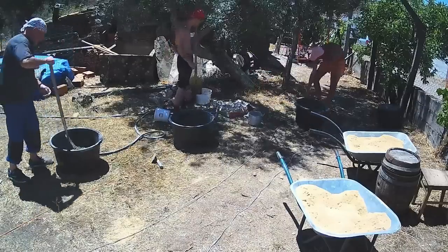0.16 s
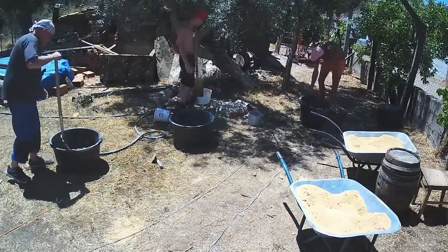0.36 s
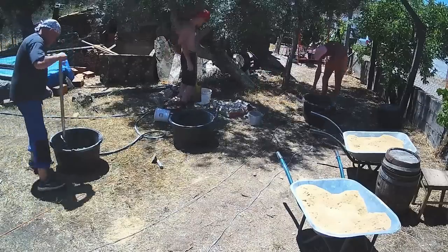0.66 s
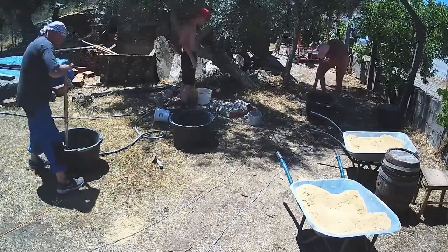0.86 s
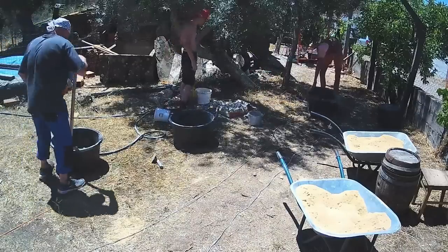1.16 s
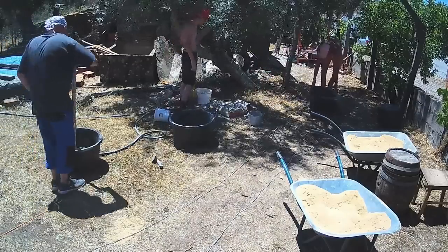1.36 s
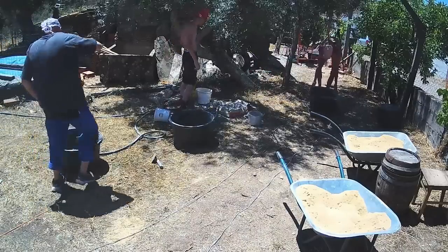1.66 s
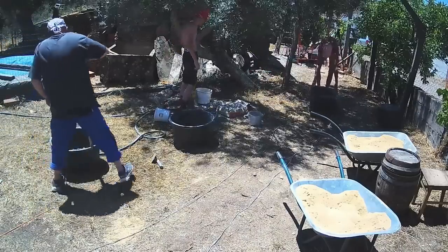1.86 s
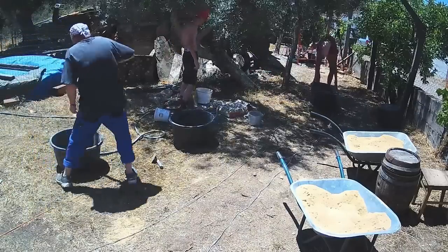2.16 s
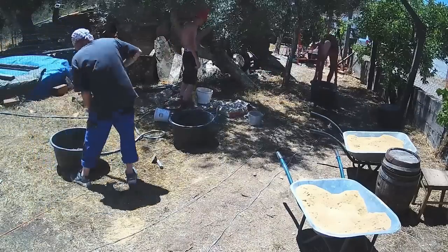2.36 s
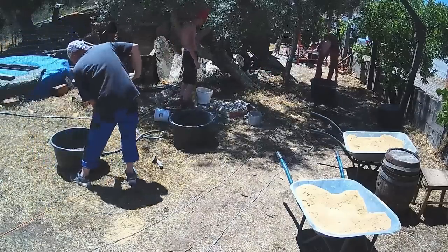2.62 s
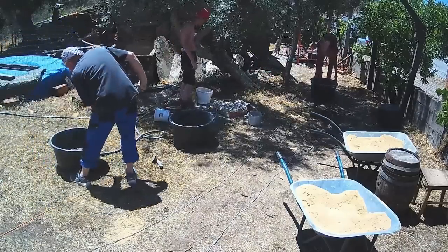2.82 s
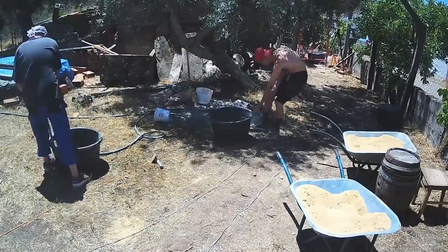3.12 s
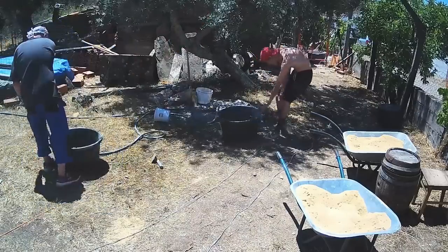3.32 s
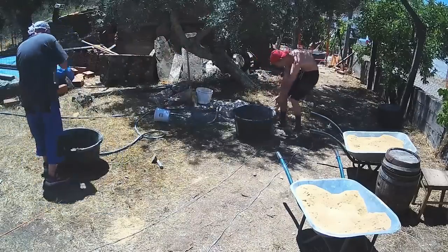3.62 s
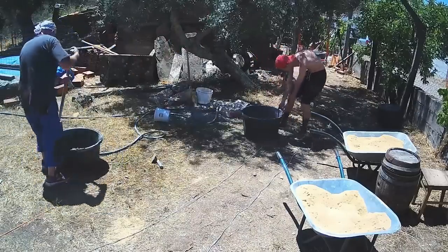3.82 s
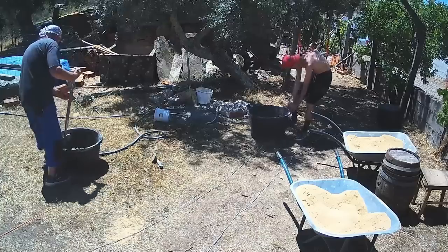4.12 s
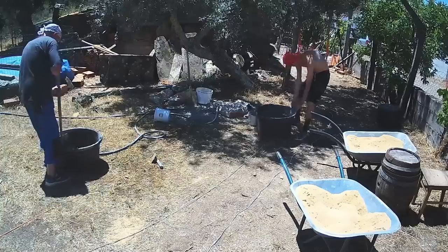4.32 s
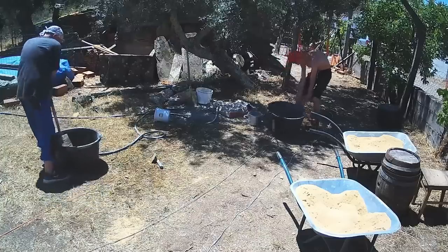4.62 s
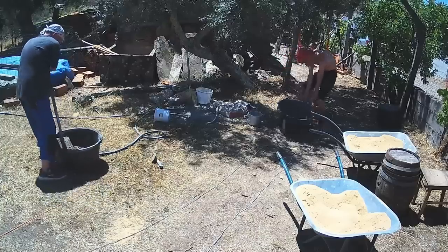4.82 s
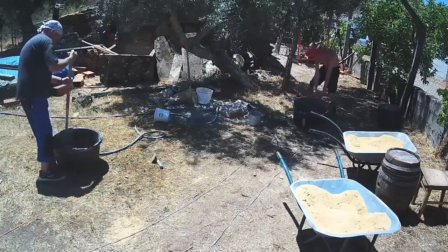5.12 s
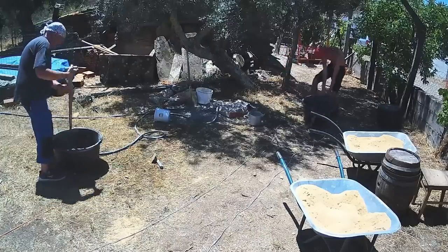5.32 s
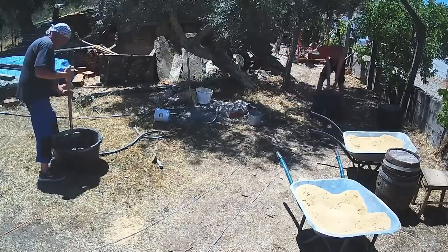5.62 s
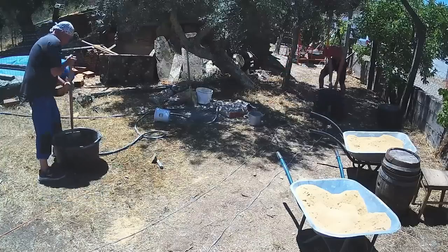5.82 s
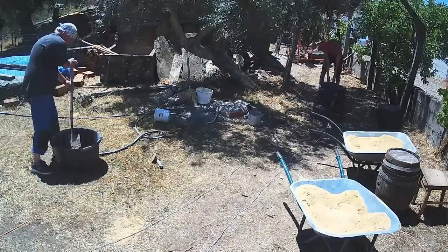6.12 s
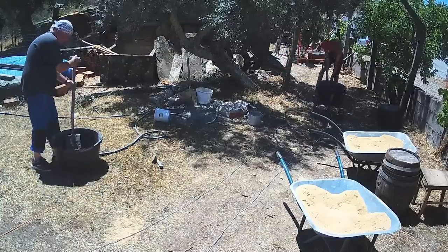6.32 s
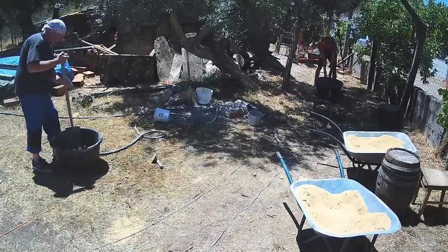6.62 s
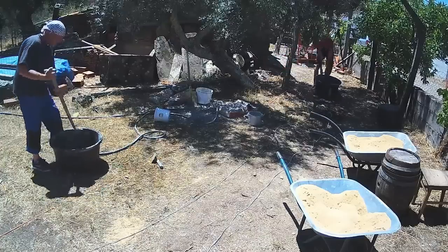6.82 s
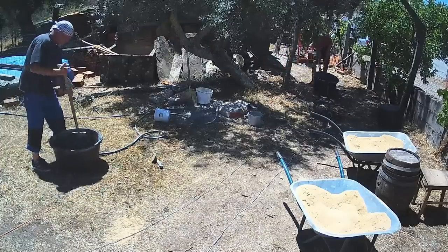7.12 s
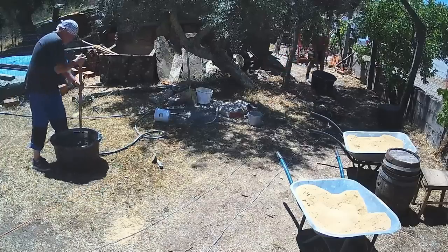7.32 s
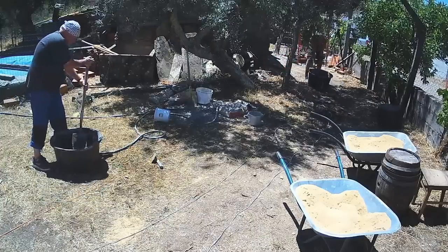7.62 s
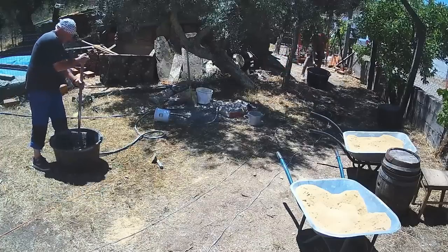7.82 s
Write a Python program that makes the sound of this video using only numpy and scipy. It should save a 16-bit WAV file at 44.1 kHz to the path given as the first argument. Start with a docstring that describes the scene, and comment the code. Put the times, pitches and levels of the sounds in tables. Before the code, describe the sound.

A hoe scrapes and churns wet, gritty mortar in a rubber tub, with sharp clacks and dull thumps over a light outdoor breeze.

```python
"""A hoe works wet, sandy mortar in a rubber tub, a few metres away in a yard.
The steel blade drags through the grit in jerks, and the mix slops about. The blade also rasps along
the tub, clacks on it, thumps its wall and squeaks on stones.
Behind the work, a light breeze rustles the trees and puffs on the microphone.
Dull, low thuds come from the bumped tub, footsteps and the puffs of wind."""
import sys
import numpy as np
from scipy import signal
from scipy.fft import rfft, irfft, next_fast_len
from scipy.io import wavfile
from scipy.ndimage import map_coordinates

SR = 44100
rng = np.random.default_rng(int(sys.argv[2]) if len(sys.argv) > 2 else 0)


def inscribe(sig):
    """Save sig as 16-bit PCM at rate SR to the path in sys.argv[1].

    A 1-D sig is mono; a 2-D sig holds one channel per row.
    Samples are clipped to [-1, 1] before scaling.
    """
    pcm = np.round(np.clip(np.atleast_2d(sig).T, -1, 1) * 32767)
    wavfile.write(sys.argv[1], SR, pcm.astype(np.int16))


N = 351477

# Tone colours, or how strong each frequency is: f/Hz, level/dB
SLOP_TONE = [(60, -48), (150, -11), (250, 1), (310, 1), (380, -0.5), (480, -3), (560, -4.5), (680, -1.5),
             (1000, -11), (2500, -78)]  # wet mix against the tub
SAND_TONE = [(1500, -7), (3000, 2), (4800, 2), (6500, -3), (9500, -5), (12500, -15.5), (14500, -27),
             (16000, -41)]  # hissing sand
CLICK_TONE = [(200, -11.5), (600, -14), (1100, 2.5), (1900, 7.5), (2700, -5), (4200, -31), (6500, -22),
              (12000, -57)]  # a hard tap of stone or steel
GRIND_TONE = [(900, -34.5), (1500, -9), (1900, 8.5), (2300, 3), (2900, 0), (4000, -4), (5500, -11.5),
              (8000, -20.5), (12000, -65)]  # crushed grit


def amp(db):
    """Turn decibels into a gain."""
    return 10 ** (np.asarray(db) / 20)


def unit(x):
    """Scale a signal to an average (rms) size of 1."""
    return x / np.sqrt(np.mean(x ** 2) + 1e-20)


def along(points, hz):
    """Read between (f/Hz, value) points on a logarithmic frequency scale."""
    f, v = np.transpose(points)
    return np.interp(np.log(hz + 1), np.log(f + 1), v)


def add(track, s, sound):
    """Mix a sound into a track, starting at s seconds."""
    part = track[max(round(s * SR), 0):][:len(sound)]
    part += sound[:len(part)]


def through(x, response):
    """Filter x: each of its samples sets off a copy of the response."""
    return signal.fftconvolve(x, response)[:N]


def colour(x, tone, size=4096):
    """Give x a tone colour, using a filter of energy 1."""
    cepstrum = irfft(np.log(amp(along(tone, np.fft.rfftfreq(size, 1 / SR)))))
    fold = 1 + np.sign(size / 2 - np.arange(size))  # nothing sounds before its cause
    response = irfft(np.exp(rfft(cepstrum * fold)))
    return through(x, response / np.linalg.norm(response))


def wobble(rate):
    """A smooth curve through random values, rate of them a second."""
    return map_coordinates(rng.standard_normal(int(N * rate / SR) + 4), [np.arange(N) * rate / SR])


def grains(rate, spread_db):
    """Tiny random ticks of uneven size, about rate of them a second."""
    sizes = amp(spread_db * np.clip(rng.standard_normal(N), -2, 2)) * np.sign(rng.standard_normal(N))
    return unit(sizes * (rng.random(N) < rate / SR))


def swells(rows, attack_s, release_s, sag_db_per_s=0):
    """A gain curve from (t/s, length/s, level/dB) rows: each rises, holds or sags, then fades."""
    power, t = np.zeros(N), np.arange(int(1.2 * SR)) / SR
    for s, length, db in rows:
        fade = np.exp(-np.maximum(t - length, 0) / release_s)
        gain = amp(db - sag_db_per_s * t) * np.minimum(t / attack_s, 1) * fade
        add(power, s, gain[s + t >= 0] ** 2)
    return np.sqrt(power)


def breeze():
    """Trees rustle steadily, and uneven air rumbles on the microphone."""
    # Tone colours of the trees and of the rumble: f/Hz, level/dB
    rustle_tone = [(40, -11), (120, -6), (250, -13.5), (450, 4.5), (900, 5), (1700, 6.5), (2600, -1),
                   (4000, -9.5), (8000, -10), (12000, -17), (15000, -29)]
    rumble_tone = [(20, -0.5), (50, -5.5), (90, -1.5), (150, -3), (260, -9), (600, -49)]
    # Puffs of air: t/s, length/s, level/dB
    puffs = [(0.1, 0.2, -53.5), (1.3, 0.55, -56), (2.1, 0.29, -52), (4.62, .1, -58), (5.18, 0.31, -49),
             (5.56, 0.027, -41), (5.69, 0.14, -37), (6.12, 0.046, -36.5), (6.25, 0.074, -31.5),
             (7.35, 0.25, -56)]
    air = amp(-62) + swells(puffs, attack_s=0.013, release_s=0.058)  # never quite still
    rustle = amp(-51) * colour(rng.standard_normal(N), rustle_tone)
    rumble = unit(amp(3.6 * wobble(25)) * colour(rng.standard_normal(N), rumble_tone))
    return rustle + air * rumble


def wall_echo(x):
    """The garden walls send back a short, blurred echo."""
    # How long the echo lasts: f/Hz, time to fade by 60 dB/s
    fade_times = [(200, 0.21), (1500, 0.21), (10000, 0.22)]
    hz, t, noise = signal.stft(rng.standard_normal(SR // 2), SR, nperseg=256)
    tail = signal.istft(noise * amp(-60 * t / along(fade_times, hz)[:, None]), SR, nperseg=256)[1]
    return through(x, np.pad(tail, (int(0.01 * SR), 0)) / np.linalg.norm(tail))


def thuds():
    """The bumped tub, footsteps and wind on the microphone give low thuds that die in a few swings."""
    # Dull pushes of air: t/s, level/dB, f/Hz
    pushes = [(0.019, -22, 189), (0.71, -33.5, 103), (1.244, -29, 183), (1.32, -32, 229),
              (1.41, -37.5, 180), (1.459, -40, 115), (1.562, -43, 120), (1.636, -42, 109), (1.74, -40, 194),
              (1.799, -29, 130), (1.829, -9, 276), (2.187, -29, 155), (3.993, -8.5, 182),
              (5.334, -13.5, 180), (5.794, -21, 173), (5.823, -20.5, 132), (6.159, -25.5, 136),
              (6.295, -18.5, 120)]
    out, t = np.zeros(N), np.arange(SR // 8) / SR
    for s, db, hz in pushes:
        cycles = hz * t
        motion = np.sin(2 * np.pi * cycles) * cycles / 0.32 * np.exp(1 - cycles / 0.33)
        speed = np.gradient(motion, 2 * np.pi * cycles)  # the sound follows the motion's speed
        add(out, s, amp(db - 0.5) * speed)
    return out


def squeaks():
    """The steel catches on a stone and briefly sings one unsteady note."""
    # Catches: t/s, f/Hz, level/dB, length/s
    catches = [(0.419, 2350, -35, 0.023), (1.238, 1880, -21, 0.011), (2.782, 1303, -34, 0.023),
               (2.785, 7540, -60, 0.023), (3.791, 1744, -18.5, 0.0056), (3.967, 940, -18, 0.0056),
               (3.992, 2530, -13.5, 0.0068), (4.391, 2790, -27.5, 0.0054), (5.345, 1040, -17, 0.029),
               (5.346, 906, -18, 0.024), (6.882, 1562, -14, 0.011), (7.191, 3860, -27, 0.006)]
    out = np.zeros(N)
    for s, hz, db, length in catches:
        progress = np.linspace(0, 1, max(int(length * SR), 8))
        phase = np.cumsum(2 * np.pi * hz / SR + 0.078 * rng.standard_normal(len(progress)))
        add(out, s, amp(db) * np.sin(np.pi * progress ** 1.1) * np.sin(phase))
    return out


def tub_thumps():
    """The bumped rubber wall rings briefly with several low notes at once."""
    # Bumps: t/s, level/dB, damping (1 rings freely, more dies sooner)
    bumps = [(1.244, -31, 1.2), (1.8308, -4, 1.3), (3.995, -21.5, 0.78), (5.334, -19.5, 2.4),
             (6.832, -34, 1.2), (6.886, -29.5, 1.5)]
    # Notes of the freely ringing wall: f/Hz, level/dB, time to fade by 60 dB/s
    notes = [(138, -18, 0.21), (213, -6, 0.073), (292, 2.5, 0.042), (378, -3, 0.057), (474, -8.5, 0.094),
             (550, -11, 0.12), (675, -17.5, 0.17), (765, -9.5, 0.032), (1175, -12, 0.056)]
    out, t = np.zeros(N), np.arange(SR // 3) / SR
    for s, db, damping in bumps:
        ring = np.zeros(len(t))
        for hz, level, fade_s in notes:
            gain = amp(level + rng.normal(0, 2.2) - 60 * t * damping / fade_s)
            ring += gain * np.sin(2 * np.pi * (hz * t + rng.normal(0, 0.11)))
        add(out, s, amp(db) * ring * (1 - np.exp(-t / 0.0017)))
    return out


def blade_ring(force, size=4096):
    """A force makes the hoe ring, and the mortar quickly muffles it."""
    # Notes of the blade: f/Hz, width/Hz (wider dies sooner), level/dB
    notes = [(921, 82, 0.5), (1040, 130, 5), (1130, 128, 9), (1455, 112, 5), (1443, 140, 6.5),
             (1860, 130, 3), (2330, 250, -8.5), (3200, 2400, -24)]
    f = np.fft.rfftfreq(size, 1 / SR)
    response = irfft(sum((-1) ** k * amp(db) * 1j * f * width / (hz * hz - f * f + 1j * f * width)
                         for k, (hz, width, db) in enumerate(notes)))
    return through(force, response / np.linalg.norm(response))


def rasps():
    """A skid shakes the blade, the tub behind it and the grit crushed between them."""
    # Skids: t/s, length/s, level/dB, then added to that level: sand/dB, tub/dB, grit/dB
    skids = [(0.41, 0.035, -44.5, -5, -30, 10), (0.825, 0.024, -38, -8, -6, -12),
             (1.237, 0.016, -31.5, -16, -3.5, -14), (1.811, 0.02, -24.5, -23, -16, -5.5),
             (1.836, 0.018, -35, -12, 14.5, -6), (2.266, 0.064, -33, -15, -4.5, -24),
             (3.862, 0.039, -27, -6.5, -1, -7.5), (3.894, 0.03, -25.5, -29, -8, -10),
             (3.962, 0.0061, -30, -24, -11, -1), (3.974, 0.046, -29.5, -14, -4.5, -3),
             (4.391, 0.013, -28.5, -37, -9, -7), (5.292, 0.017, -29, -8.5, -6, -13),
             (5.337, 0.028, -17.5, -17, -11, -9), (5.37, 0.023, -30, -9, -6, -11),
             (5.398, 0.022, -28.5, -9.5, -1, -0.5), (6.121, 0.033, -40.5, -14, -1, 8.5),
             (6.471, 0.015, -32, -25, -4, 2), (6.835, 0.047, -32, -13, -6, -4),
             (6.881, 0.025, -33.5, -18, -2, 0)]
    blade, tub, sand, grit = np.zeros((4, N))
    for s, length, db, sand_db, tub_db, grit_db in skids:
        progress = np.linspace(0, 1, max(int(length * SR), 8))
        pressure = amp(db) * np.abs(np.sin(np.pi * progress ** 0.62)) ** 0.38
        add(blade, s, pressure)
        add(tub, s, pressure * amp(tub_db))
        add(sand, s, pressure * amp(sand_db))
        add(grit, s, pressure * amp(grit_db))
    for force in (blade, tub, sand, grit):
        force *= grains(rate=5500, spread_db=2.5)  # roughens the smooth push
    return blade_ring(blade) + colour(tub, SLOP_TONE) + colour(sand, SAND_TONE) + colour(grit, GRIND_TONE)


def clacks():
    """Blade and stones strike: one sharp tap, then a short crunch that shakes the blade."""
    # Strikes: t/s, level/dB, then added to that level: sand/dB, tub/dB
    strikes = [(1.243, -12, -12, -10), (1.816, -4.5, -28, -17), (1.829, -1.5, -27, -4),
               (1.856, -3, -12, -26), (2.787, -24.5, -13, -22), (3.212, -25, -25, 0),
               (3.260, -20.5, -25, 0), (3.412, -20, -31, -16), (3.7923, -14.5, -23, -2.5),
               (3.85, -23, -11, -11), (3.964, -20, -26, 4), (3.991, -8.5, -7, 0), (4.29, -20, -16, -1),
               (4.392, -18, -36, -13), (4.958, -16.5, -10, -4), (5.164, -18, -14, -17),
               (5.1973, -15, -29, -7.5), (5.289, -13, -27, -8), (5.347, -1.5, -15, -18),
               (5.403, -7, -13, -22), (5.452, -22, -32, -22), (5.714, -11.5, -7, -19),
               (5.951, -11, -22, -13.5), (6.127, -11, -18, -30), (6.288, -11.5, -11.5, -11),
               (6.473, -8.5, -28, -27), (6.534, -6, -40, -20), (6.612, -11, -27, -25),
               (6.833, -8, -10, -3.5), (6.885, -8, -8.5, -3), (7.225, -18.5, -30, -4.5),
               (7.705, -20, -14, -9)]
    crunch_fade_s = 0.025  # the wet mix smothers every strike alike
    tap, blade, tub, sand = np.zeros((4, N))
    t = np.arange(SR // 8) / SR
    hiss_shape = (1 - np.exp(-t / 0.00081)) * amp(-60 * t / 0.068)
    for s, db, sand_db, tub_db in strikes:
        crunch = rng.standard_normal((3, len(t))) * amp(-60 * t / crunch_fade_s)
        add(tap, s, amp([db + 6.5]))
        add(blade, s, amp(db - 11) * crunch[0])
        add(tub, s, amp(db + tub_db - 7) * crunch[1])
        add(sand, s, amp(db + sand_db - 4) * crunch[2] * hiss_shape)
    return colour(tap, CLICK_TONE) + blade_ring(blade) + colour(tub, SLOP_TONE) + colour(sand, SAND_TONE)


def slips(rate, fade_s):
    """The blade sticks and breaks free in random jerks, about rate of them a second."""
    kicks = rng.random(N) * (rng.random(N) < rate / SR)
    jerks = signal.lfilter([1], [1, -np.exp(-1 / (fade_s * SR))], kicks)
    return unit(jerks - jerks.mean())


def hoe_strokes():
    """Sand grinds in clumps under the moving blade, small stones tick and the wet mix slops."""
    # Pushes and pulls: t/s, length/s, effort/dB, then added to the effort: slop/dB, grinding/dB
    strokes = [(-0.03, 0.24, -37.5, -9.5, -12.5), (0.255, 0.96, -39.5, -10.5, -17),
               (1.03, 0.31, -36, -13, -9.5), (1.413, 0.65, -50.5, -8, -21), (1.924, .14, -35, -12, -9),
               (2.046, 0.2, -37.5, -2, -9), (2.217, 0.26, -32, -6.5, -25), (2.519, 0.24, -37.5, -3.5, -26),
               (3.056, .16, -42, -1.5, -21), (3.245, 0.042, -35, -9.5, -19),
               (3.383, 0.16, -40.5, -7.5, -12), (3.613, 0.082, -37.5, -6, -21), (3.742, 0.11, -45, 1, -20),
               (4.024, 0.15, -45, 1.5, -23), (4.177, 0.19, -40, 0, -7), (4.377, 0.45, -38, -7, -12.5),
               (4.716, 0.26, -40, -6, -6.5), (5.014, 0.043, -40, -4.5, -4), (5.139, 0.081, -35.5, -7, -8.5),
               (5.4, 0.31, -37, -4, -6), (5.697, 0.65, -34.5, -4.5, -3), (6.028, 0.21, -36, -4.5, -1.5),
               (6.223, 0.21, -31.5, -5.5, -4.5), (6.454, .33, -32, -6.5, -9.5),
               (6.896, 0.27, -35.5, -7.5, -7), (7.157, 0.31, -36, -3.5, -5.5), (7.48, 0.44, -37, -5, -4.5)]
    # Loose sand sliding: t/s, length/s, level/dB
    slides = [(0.33, 0.1, -51), (0.76, 0.087, -52.5), (1.17, 0.27, -55), (3.085, 0.047, -52),
              (3.485, 0.02, -52), (4.25, 0.033, -49.5), (4.62, 0.056, -53), (4.76, 0.086, -53.5),
              (5.6, 0.06, -51), (5.97, 0.26, -50), (7.17, 0.022, -42), (7.69, 0.028, -49.5)]
    # Tone colour of the dragging blade: f/Hz, level/dB
    drag_tone = [(300, -43.5), (560, -9), (690, -9.5), (810, -7), (1000, 1), (1150, 3.5), (1330, -0.5),
                 (1520, 2), (1680, 0.5), (1900, 1.5), (2100, -5), (2400, -7.5), (3300, -15.5), (5000, -29),
                 (9000, -57)]
    s, length, effort_db, slop_db, grind_db = np.transpose(strokes)
    # In each stroke the blade bites, the arm slows and the mix comes to rest.
    effort, slopping, grinding = [
        swells(zip(s, length, db), attack_s=0.03, release_s=0.08, sag_db_per_s=2.5)
        for db in (effort_db, effort_db + slop_db, effort_db + grind_db)]
    sliding = swells(slides, attack_s=0.013, release_s=0.033)
    hissing = np.sqrt(amp(-59) ** 2 + (amp(-23) * effort) ** 2 + sliding ** 2)  # faint between strokes
    jerk = np.minimum(slips(rate=87, fade_s=0.0046), 3)  # limit the hardest jerks
    clumps_db = 0.47 * wobble(28) + 1.37 * jerk
    drag = effort * amp(clumps_db - 2.7) * colour(grains(rate=6000, spread_db=1), drag_tone)
    grind = grinding * amp(clumps_db + 1.26 * jerk - 2.93)
    grind *= colour(grains(rate=2200, spread_db=1.5), GRIND_TONE)
    stones = effort * amp(clumps_db - 12) * colour(grains(rate=90, spread_db=1.5), CLICK_TONE)
    slop = slopping * amp(clumps_db + 1.35 * wobble(30) - 3.1)
    slop *= colour(grains(rate=900, spread_db=0.5), SLOP_TONE)
    sand = hissing * amp(0.4 * clumps_db + 0.85 * wobble(60))
    sand *= colour(grains(rate=14000, spread_db=-1.5), SAND_TONE)
    return drag + grind + stones + slop + sand


def scene():
    """Mix the work and the breeze in one channel; only the blows echo."""
    blows = rasps() + clacks() + tub_thumps()
    return (hoe_strokes() + blows + squeaks() + amp(-12.5) * wall_echo(blows) + thuds() + breeze())[None]


def record(dry):
    """The microphone thins the deep bass, flattens peaks at full scale and cuts the highest treble."""
    bass_hz, top_hz = 60, 15400
    thinned = signal.sosfilt(signal.butter(3, bass_hz, "highpass", fs=SR, output="sos"), dry)
    size = next_fast_len(N + SR // 4)
    spectrum = rfft(np.clip(thinned, -1, 1), size)
    return irfft(spectrum * (np.fft.rfftfreq(size, 1 / SR) < top_hz), size)[..., :N]


dry = scene()
out = record(dry)
inscribe(out)
```